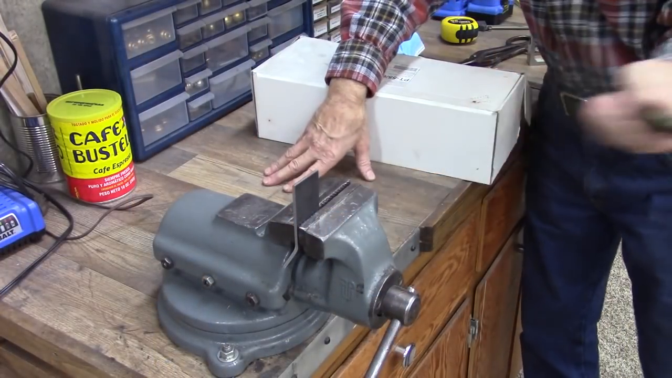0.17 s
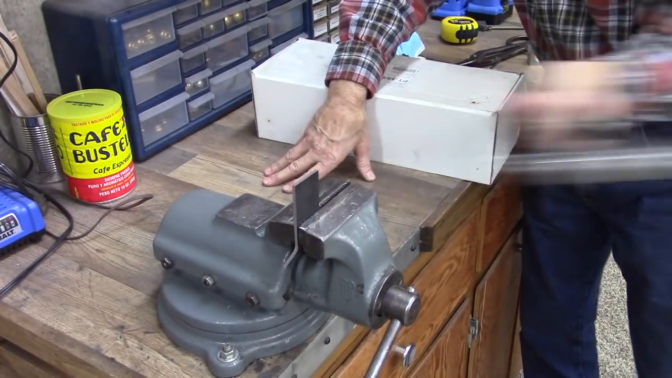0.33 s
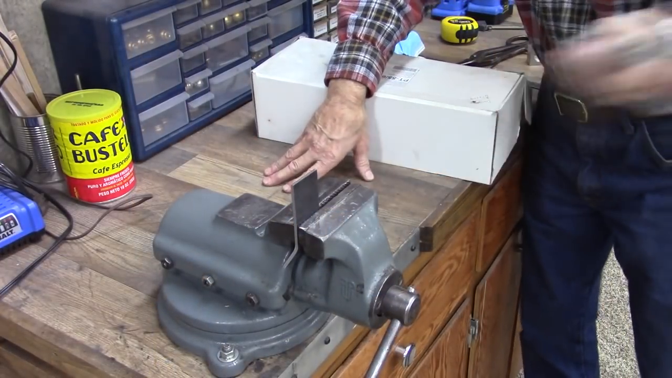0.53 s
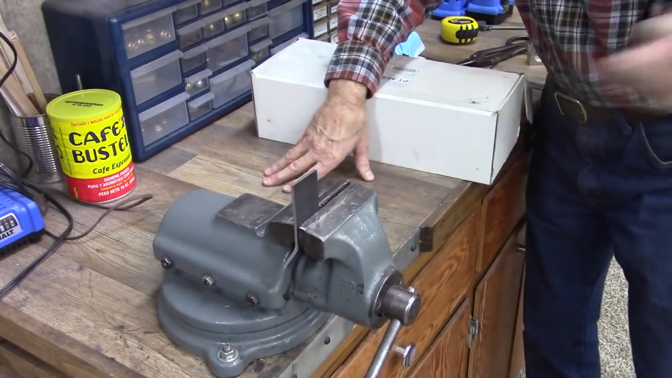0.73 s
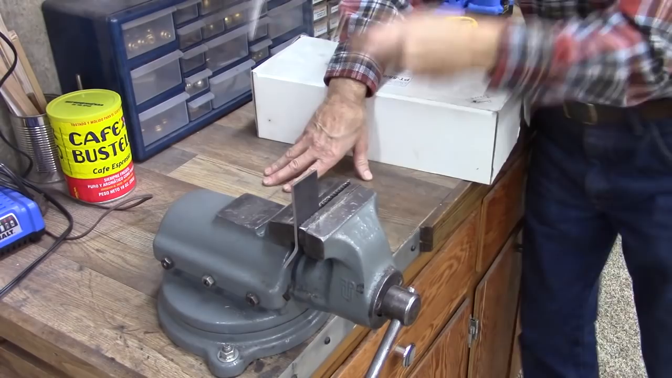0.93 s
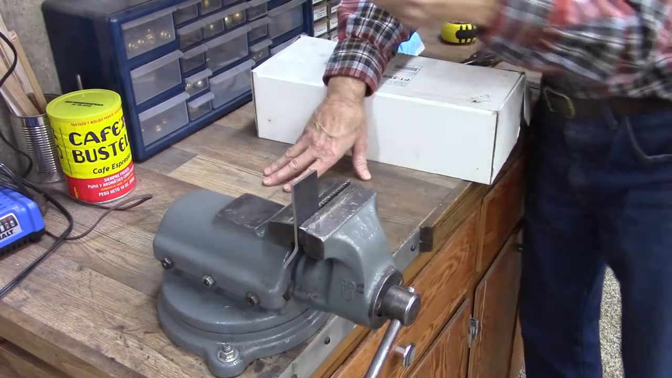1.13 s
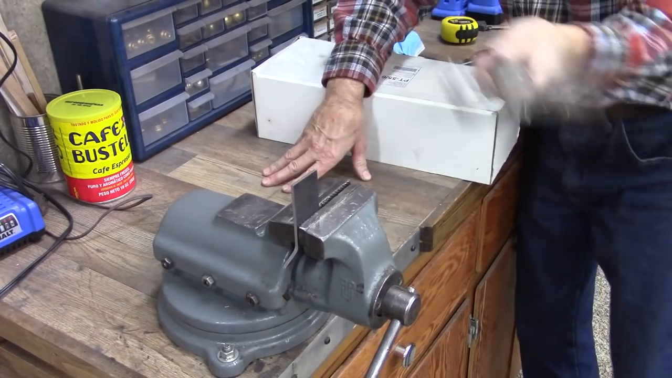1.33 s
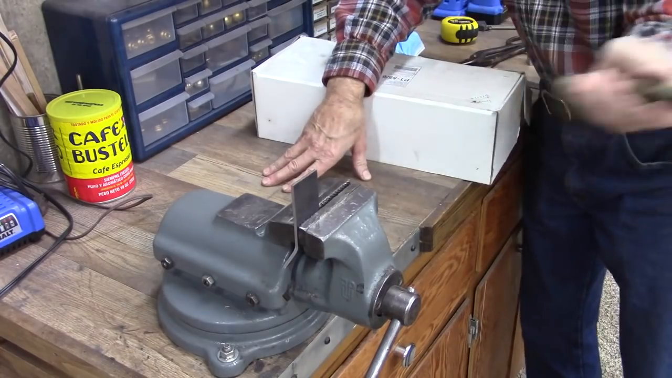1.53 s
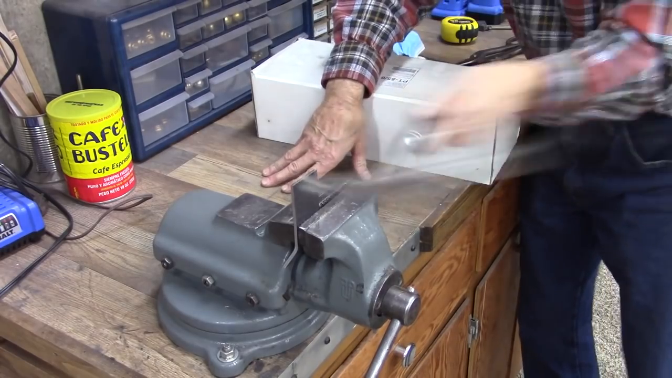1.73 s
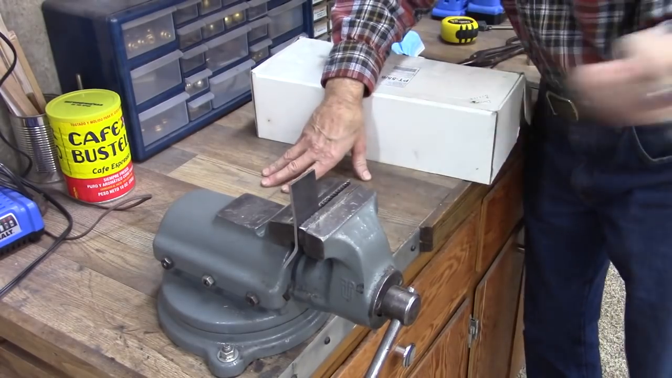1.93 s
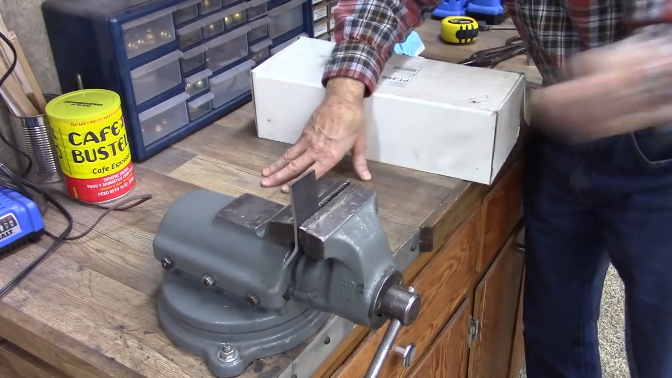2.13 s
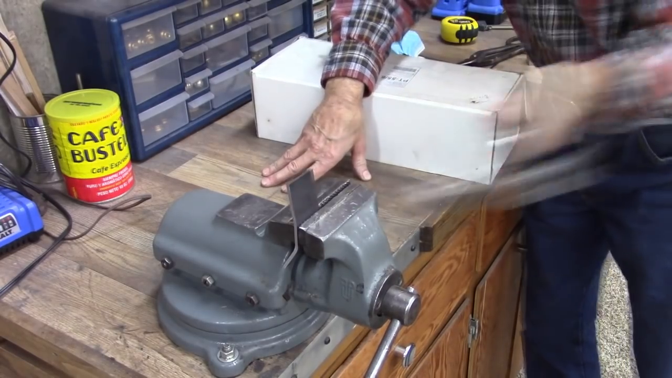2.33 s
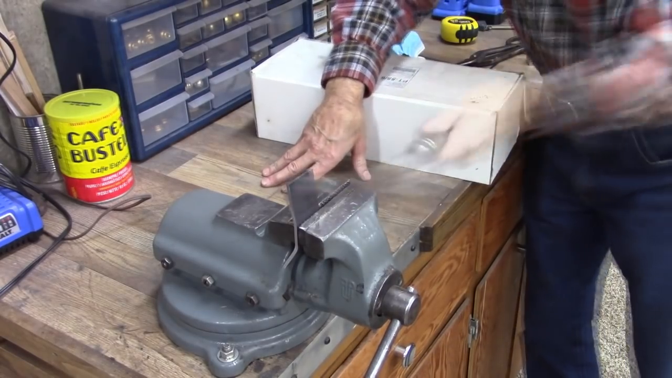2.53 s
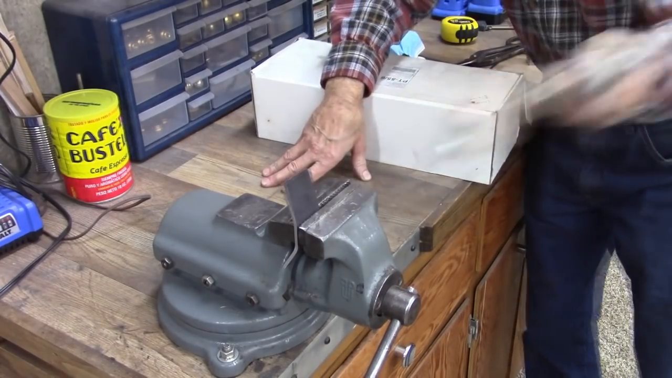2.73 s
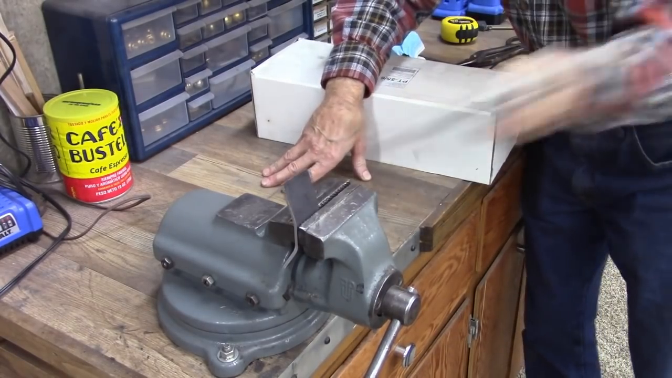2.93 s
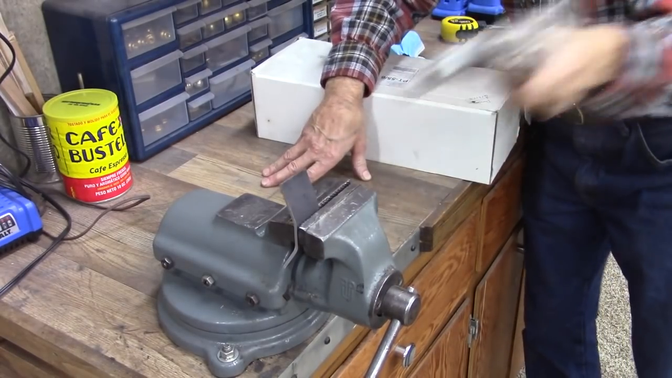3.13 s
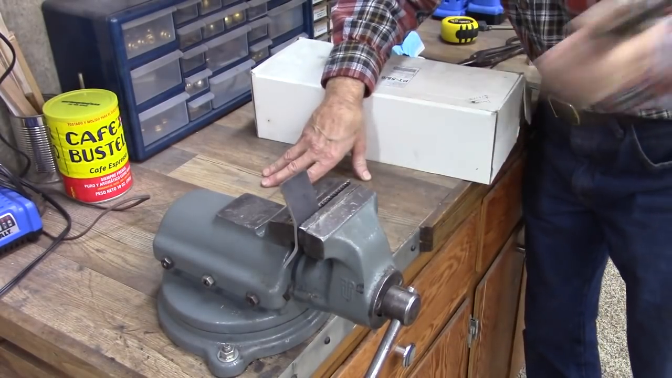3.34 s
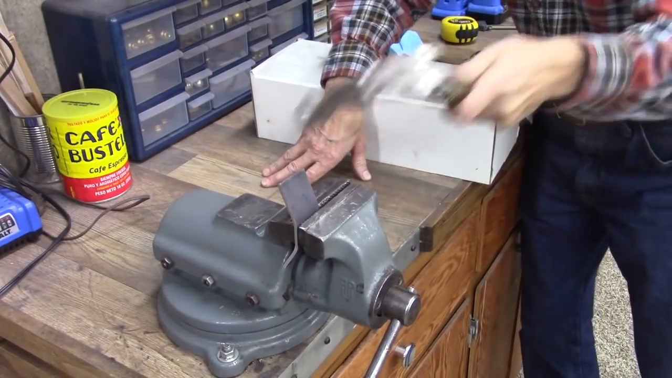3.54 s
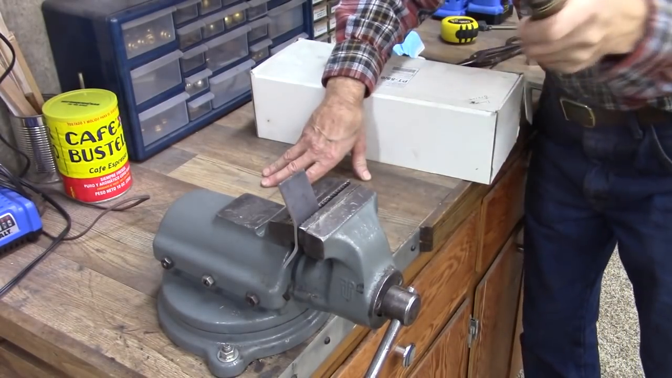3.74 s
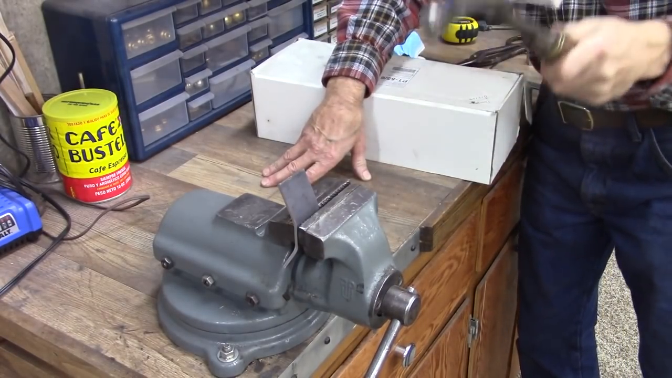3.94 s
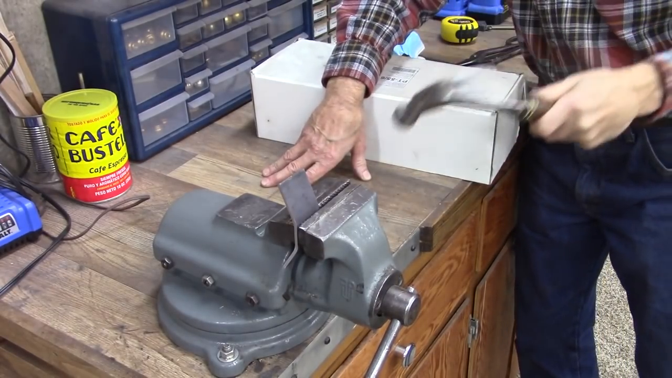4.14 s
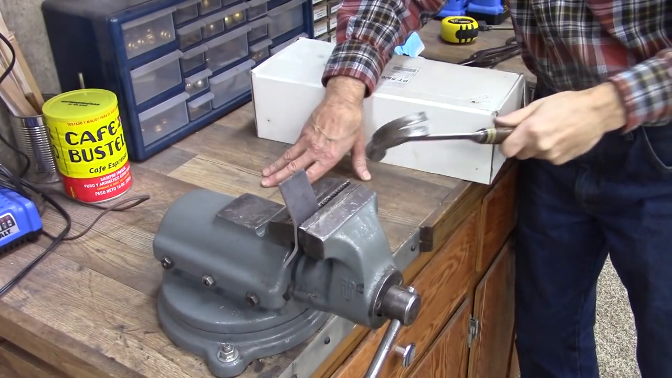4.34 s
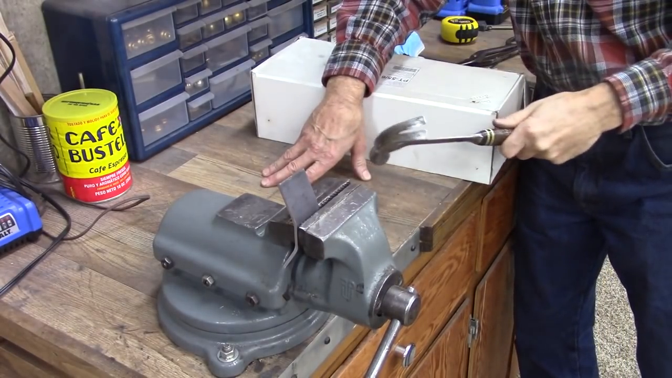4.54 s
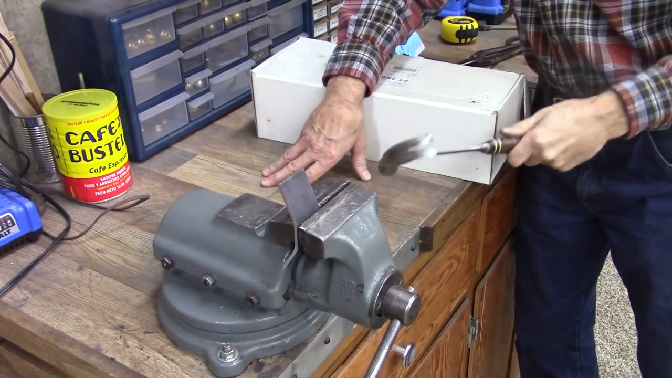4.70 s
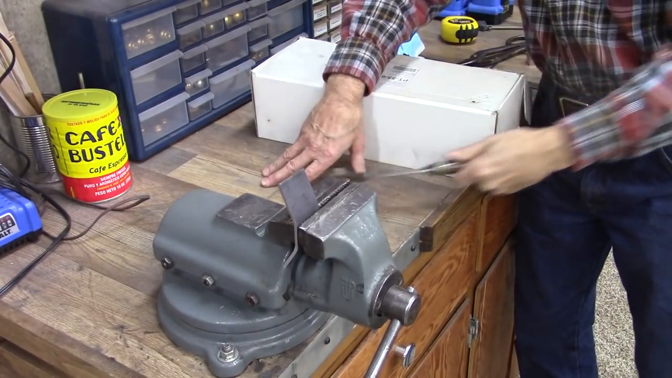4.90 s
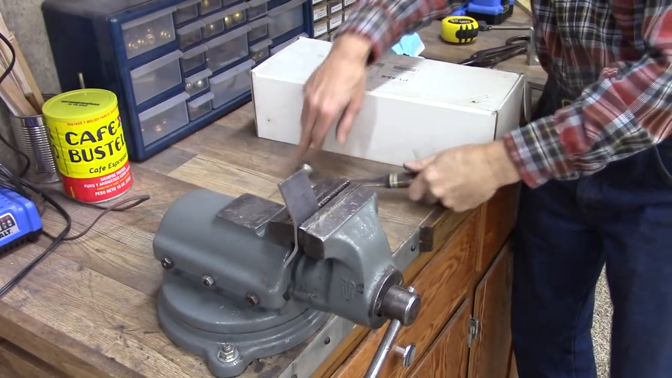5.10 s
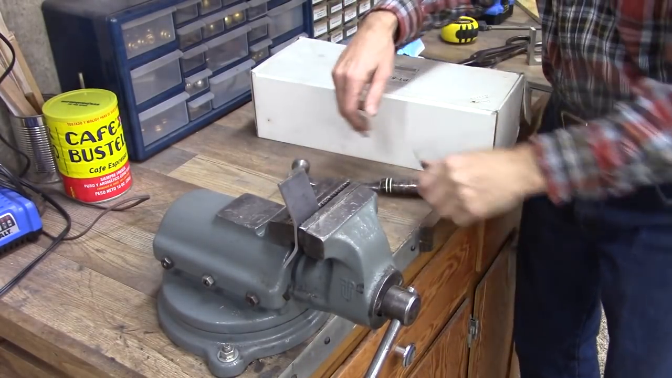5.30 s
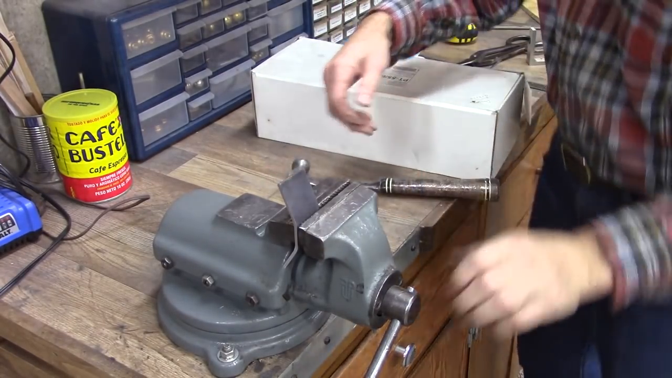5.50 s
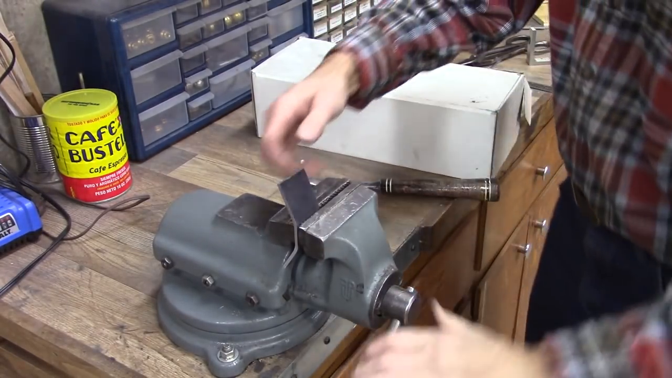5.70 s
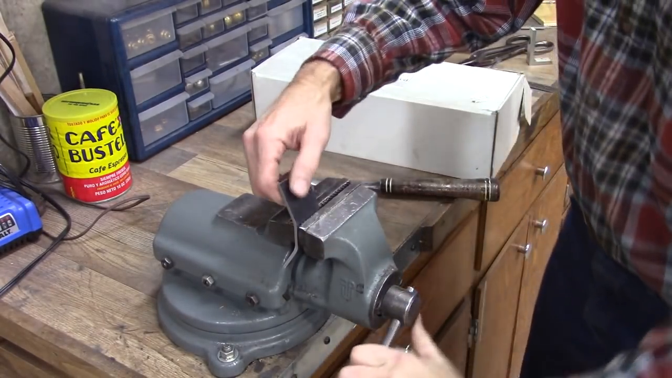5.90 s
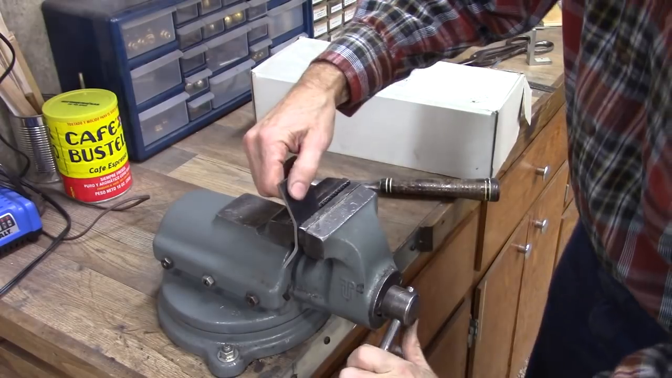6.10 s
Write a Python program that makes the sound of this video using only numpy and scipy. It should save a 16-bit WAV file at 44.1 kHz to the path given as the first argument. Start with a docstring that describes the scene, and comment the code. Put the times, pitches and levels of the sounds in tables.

```python
"""Hammering a steel strip over in a vise

A hammer bends a thin steel strip clamped in a bench vise, in a small hard-walled workshop. Each blow is a
burst of steel chatter through damped resonances, plus strip modes and a later vise and bench thud.
The hammer is then laid down: wood-coloured bursts and modes. Noise reflections and room tone surround it.
A close, nearly mono microphone overloads; its gain control ducks the blows and recovers into the room's tail."""
import sys
import numpy as np
from scipy import signal
from scipy.fft import rfft, irfft
from scipy.io import wavfile

SR = 44100
rng = np.random.default_rng(int(sys.argv[2]) if len(sys.argv) > 2 else 0)


def store_pcm(level_fs):
    """Save levels as 16-bit WAV."""
    pcm = np.round(np.clip(level_fs, -1, 1) * 32767).astype(np.int16)
    wavfile.write(sys.argv[1], SR, np.atleast_2d(pcm).T)


N = 271668
LEAD_S, EVENT_S = 0.25, 1.2  # track pre-roll; longest event
AGE = np.arange(int(EVENT_S * SR)) / SR  # time since an event began [s]

# Hammer on strip; spot 0 near the jaws, 1 at the free tip; glance 0 is a square hit.
# Ring level is set blow by blow: some ring freely, others sound muted.
# (time [s], force [dB], contact t60 [s], strip pitch [Hz], ring [dB], landing spot [0-1], glance [0-1])
HAMMER_BLOWS = [ (-.085, 24, 0.023, 1086, -2.5, .12, .06), (0.4734, 26, 0.013, 1085, -10.5, .25, 0),
                (0.9239, 23.5, 0.045, 1100, -4, 0.63, 1), (1.8344, 28.5, 0.011, 1122, -21.5, 0.27, 0.08),
                (2.1819, -3, 0.015, 1155, -19, 0.98, 0), (2.294, 23.5, 0.013, 1165, -8.5, 0.88, .08),
                (2.6309, 18.5, 0.003, 1155, -20, 0.9, 0), (2.733, 13.5, .025, 1146, -16.5, 0.93, 0.1),
                (3.0726, 28, 0.03, 1169, -17.5, 0, 0.01), (3.5188, 28, 0.031, 1210, -19.5, 0.05, 0.01)]
# Broad colour of the steel smack: (frequency [Hz], level [dB])
SMACK_SPECTRUM = [(150, -27.5), (700, 3.5), (1300, -12), (1800, 3), (1950, -1), (2500, 7), (3700, 0.5),
                  (5500, 0), (8000, 2.5), (12000, -2), (16000, -5.5)]
# Broad colour of the iron vise: (frequency [Hz], level [dB])
VISE_SPECTRUM = [(80, -12), (220, 2.5), (400, 10), (480, 9), (600, 10), (690, 7.5), (760, 9), (850, 5),
                 (1000, 8.5), (1400, 3), (3000, -23)]
TREBLE_EDGE_HZ = (11800, 6600)  # of the smack: (near the jaws, at the tip)


def from_db(db):
    """Decibels to gain."""
    return 10 ** (np.asarray(db) / 20)


def unit(x):
    """Scale to an energy of one."""
    return x / np.sqrt(np.sum(x ** 2))


def between(pair, share):
    """The value a share of the way from the first of a pair to the second."""
    return pair[0] + (pair[1] - pair[0]) * np.clip(share, 0, 1)


def at_hz(points, hz):
    """Read a table along a log-frequency axis."""
    f, value = np.transpose(points)
    return np.interp(np.log(np.maximum(hz, 1)), np.log(f), value)


def dying(t60):
    """An envelope that falls 60 dB in t60 seconds."""
    return np.exp(-np.log(1000) * AGE / max(t60, 1e-3))


def colour(x, spectrum):
    """Causal minimum-phase filter with the given spectrum, built by folding its cepstrum."""
    size = 8192
    bin_hz = np.arange(size // 2 + 1) * SR / size
    cepstrum = irfft(np.log(from_db(at_hz(spectrum, bin_hz))))
    cepstrum[1:size // 2] *= 2
    cepstrum[size // 2 + 1:] = 0
    impulse = irfft(np.exp(rfft(cepstrum)))[:size // 2]
    return signal.fftconvolve(x, impulse)[:len(x)]


def high_pass(x, hz):
    """Third-order low cut."""
    return signal.sosfilt(signal.butter(3, hz, "high", fs=SR, output="sos"), x)


def band(x, hz, octaves):
    """A cluster of close, well-damped resonances around hz."""
    edges_hz = hz * 2 ** (np.array([-0.5, 0.5]) * octaves)
    edges_hz = np.minimum(edges_hz, [0.44 * SR, 0.45 * SR])
    # tiny offset avoids denormals
    return signal.sosfilt(signal.butter(2, edges_hz, "band", fs=SR, output="sos"), x + 1e-18)


def with_humps(spectrum, humps, edge_hz=20000, steepness_db_per_octave=36, edge_floor_db=-15):
    """A spectrum plus broad resonances (Hz, dB, octaves); a treble edge shelves off the spectrum above it."""
    hz = np.geomspace(20, SR / 2, 300)
    shelf_db = np.clip(-steepness_db_per_octave * np.log2(hz / edge_hz), edge_floor_db, 0)
    power = from_db(at_hz(spectrum, hz) + shelf_db) ** 2
    for centre_hz, db, octaves in humps:
        detune = 2 * np.log2(hz / centre_hz) / octaves
        power = power + from_db(db) ** 2 / (1 + detune ** 4)
    return np.column_stack([hz, 10 * np.log10(power)])


def mode(hz, db, t60):
    """A struck mode: a dying sine with the given energy."""
    return from_db(db) * unit(np.sin(2 * np.pi * hz * AGE) * dying(t60))


def contact(t60, rebound_share=0.0, rebound_s=0.0033):
    """Chatter between hard faces, near-even in spectrum, of energy one; a springy part touches twice."""
    rebound = rebound_share * np.interp(AGE - rebound_s, AGE, dying(t60), left=0)
    envelope = np.hypot(dying(t60), rebound)
    burst = rng.standard_normal(len(AGE))
    # alternate shaping in time with flattening in frequency
    for _ in range(8):
        spectrum = rfft(burst * envelope)
        burst = irfft(spectrum / (np.abs(spectrum) + 1e-12), len(AGE))
        envelope = envelope ** 0.7
    return unit(burst * dying(10 * t60))


def silent_track():
    """An empty track that begins LEAD_S early."""
    return np.zeros(N + int(LEAD_S * SR))


def add(track, s, sound):
    """Mix a sound into a track that begins LEAD_S early."""
    start = max(round((s + LEAD_S) * SR), 0)
    track[start:start + len(sound)] += sound[:len(track) - start]


def hammer_blows(bench_lag_s=0.0045, thud_t60_s=0.07, rebound_share=0.9, ping_octaves=0.18,
                 afterring_db=-27, afterring_t60_s=0.3):
    """Face and strip chatter, strip modes ring, vise and bench answer late; returns hits and rings."""
    # Strip's upper modes: (frequency [Hz], level [dB], t60 [s])
    overtone_modes = [(1482, 7, 0.11), (4070, 2.5, .25), (4810, 3.5, 0.15), (5225, 2, .2), (5670, 0.5, .2),
                      (8495, -8, .2), (9850, -6, .15)]
    # Vise and bench modes: (frequency [Hz], level [dB], t60 [s])
    bench_modes = [(82, -11.5, 0.52), (111.4, -8, 0.62), (195.86, -16, 0.89), (213.4, -24, 1.0),
                   (204.4, 5, 0.15), (293, -20.5, 0.6), (343, -9.5, 0.53), (426, -20, 0.55),
                   (591.5, -20, 0.2), (626, -17, 0.6), (760, -22.5, 0.53)]
    # Broad colour of the bench's thud: (frequency [Hz], level [dB])
    thud_spectrum = [(25, -19), (50, -11.5), (80, 7), (140, 14.5), (200, 15), (250, 18.5), (340, 20),
                     (480, -0.5), (800, -0.5), (2000, -21)]
    # bending stiffens the strip: (straight, fully bent)
    strip_hz, ring_t60_s = (1087, 1213), (0.56, 0.2)
    # a glancing blow drives the bench less and the overtones more: (square, glancing)
    thud_db, vise_db = (-2, -14.5), (-0.5, 2)
    overtones_db, ping_db = (-30, -22.5), (2.5, 15)

    hits, rings = silent_track(), silent_track()
    overtones = sum(mode(*row) for row in overtone_modes)
    bench = sum(mode(*row) * (-1) ** k for k, row in enumerate(bench_modes))
    for s, force_db, contact_s, ring_hz, ring_db, spot, glance in HAMMER_BLOWS:
        force = from_db(force_db)
        bend = (ring_hz - strip_hz[0]) / (strip_hz[1] - strip_hz[0])

        # the strip springs back against the face; both touches excite its damped resonances
        resonances = strip_resonances(bend, spot, glance)
        ping = (ring_hz, between(ping_db, glance), ping_octaves)  # first swing of the main mode
        smack = with_humps(SMACK_SPECTRUM, resonances + [ping], between(TREBLE_EDGE_HZ, spot))
        steel = colour(contact(contact_s, rebound_share), smack)
        upper = from_db(between(overtones_db, glance)) * overtones
        add(hits, s, force * (steel + upper))

        # main mode, clank and clang lose most of their swing at once, then ring on quietly
        ring = mode(ring_hz, ring_db, between(ring_t60_s, bend))
        for hz, db, _ in resonances[:2]:
            ring += mode(hz, db + afterring_db, afterring_t60_s)
        add(rings, s, force * ring)

        # heavy vise and bench answer a moment later
        thud_gain = from_db(between(thud_db, glance))
        vise_gain = from_db(between(vise_db, glance))
        thud = thud_gain * colour(contact(contact_s + thud_t60_s), thud_spectrum)
        iron = vise_gain * colour(contact(contact_s + thud_t60_s), VISE_SPECTRUM)
        add(hits, s + bench_lag_s, force * (thud + iron))
        add(rings, s + bench_lag_s, force * thud_gain * bench)
    return hits, rings


def strip_resonances(bend, spot, glance, octaves=0.26):
    """Damped clank, clang, sizzle and skid of the struck strip: (Hz, dB, octaves)."""
    # landing spot: (near the jaws, at the tip)
    clank_hz, clang_hz = (3262, 2830), (4380, 5950)
    clang_db, sizzle_db = (8.5, 1), (-7, 4)
    sizzle_hz = (8200, 11500)  # (straight, fully bent)
    clank_db, skid_db = (14, -3), (-10.5, 3)  # (square, glancing)
    return [(between(clank_hz, spot), between(clank_db, glance), octaves),
            (between(clang_hz, spot), between(clang_db, spot), octaves),
            (between(sizzle_hz, bend), between(sizzle_db, spot), octaves),
            (7700, between(skid_db, glance), 0.4)]  # face skidding over the edge


def cracks(crack_db=-10.5, crack_hz=9400, crack_octaves=0.68, crack_t60_s=0.002):
    """First touch of each blow: a very brief, bright crack, beamed too narrowly to fill the room."""
    track = silent_track()
    for s, force_db, *_ in HAMMER_BLOWS:
        crack = unit(band(contact(crack_t60_s), crack_hz, crack_octaves))
        add(track, s, from_db(force_db + crack_db) * crack)
    return track


def noise_swell(start_s=2.19, length_s=0.073, noise_db=2.6, swell_db=7, bend=0.39, spot=1.0,
                glance=0.056, vise_db=2):
    """A short noise swell before the next blow, coloured like strip and vise."""
    swell = from_db(swell_db * np.minimum(AGE / length_s, 1)) * (AGE < length_s)
    noise = from_db(noise_db) * unit(rng.standard_normal(len(AGE)) * swell)
    resonances = strip_resonances(bend, spot, glance)
    smack = with_humps(SMACK_SPECTRUM, resonances, between(TREBLE_EDGE_HZ, spot))
    steel = colour(noise, smack)
    iron = from_db(vise_db) * colour(noise, VISE_SPECTRUM)
    track = silent_track()
    add(track, start_s, steel + iron)
    return track


def hammer_laid_down(wood_t60_s=0.0632, click_hz=5440, click_octaves=0.47, mode_spread_db=-3.0,
                     bass_cut_hz=180):
    """Handle and head knock on the bench top: damped wood, short modes and a click."""
    # Knocks; hardness 0 is the handle, 1 the steel head:
    # (time [s], force [dB], knock [Hz], hardness [0-1])
    knocks = [ (5.0944, 12.5, 747, 0), (5.1100, 11.5, 740, 0.23), (5.2085, 16.5, 1000, 1),
              (5.3501, 9, 1000, 0.68), (5.3738, 5, 950, 0.8), (5.4095, -4.5, 800, 0.1)]
    # Broad colour of the wood: (frequency [Hz], level [dB])
    wood_spectrum = [(40, -21), (110, 5.5), (170, 13.5), (235, 18), (350, 21.5), (470, 17), (590, 17.5),
                     (900, 11.5), (1200, 5.5), (1800, 6), (2700, 1), (4000, -8), (9000, -13.5),
                     (13000, -41)]
    # Handle and bench top modes: (frequency [Hz], level [dB], t60 [s])
    wood_modes = [(216, -8.5, .2), (345, -7, 0.32), (585, -11.5, .14), (679, -7.5, 0.25),
                  (748.5, -7, 0.094), (940, -11.5, 0.16)]
    # a harder knock is broader and clicks more: (handle, head)
    knock_db, knock_octaves = (23.5, 13.5), (0.23, 1.03)
    click_db, click_t60_s = (-20.5, 1), (0.0061, 0.043)

    track = silent_track()
    for s, force_db, knock_hz, hardness in knocks:
        hump = (knock_hz, between(knock_db, hardness), between(knock_octaves, hardness))
        wood = colour(contact(wood_t60_s), with_humps(wood_spectrum, [hump]))
        # each knock lands elsewhere and favours other modes
        ringing = sum(mode(hz, db + mode_spread_db * rng.standard_normal(), t60)
                      for hz, db, t60 in wood_modes)
        # low cut removes the bass made by the modes' abrupt sine onsets
        ringing = high_pass(ringing + 1e-18, bass_cut_hz)
        click = band(contact(between(click_t60_s, hardness)), click_hz, click_octaves)
        click = from_db(between(click_db, hardness)) * click
        add(track, s, from_db(force_db) * (wood + ringing + click))
    return track


def scuffs_and_ticks(octaves=1.0, ticks_per_s=1.3, tick_db=-37, tick_hz=2900, tick_t60_s=0.006,
                     tick_spread_db=3, tick_spread_octaves=0.5):
    """Hands and tool shift: band-limited contact noise at set times, fainter ticks at random times."""
    # Scuffs and bumps: (time [s], level [dB], frequency [Hz], t60 [s])
    scuffs = [(1.287, -25.5, 6000, 0.17), (1.371, -26, 6000, .35), (1.7826, -29, 4450, 0.034),
              (4.39, -24.5, 230, .4), (5.0455, -23, 4500, .008), (5.705, -24, 188, 0.101),
              (5.901, -39, 6000, 1.1)]
    track = silent_track()
    for s, db, hz, t60 in scuffs:
        add(track, s, from_db(db) * unit(band(contact(t60), hz, octaves)))
    touch = contact(tick_t60_s)
    duration_s = N / SR
    for when, size, pitch in rng.uniform(-1, 1, (round(ticks_per_s * duration_s), 3)):
        hz = tick_hz * 2 ** (tick_spread_octaves * pitch)
        tick = unit(band(touch, hz, octaves))
        add(track, abs(when) * duration_s, from_db(tick_db + tick_spread_db * size) * tick)
    return track


def workshop(x, build_s=0.0013, band_octaves=0.56):
    """Dense reflections that build up quickly and die band by band; returns mid and side."""
    # Reverberation time: (frequency [Hz], t60 [s])
    room_t60 = [(80, 0.56), (200, 0.5), (500, 0.49), (1200, 0.43), (3200, 0.45), (6000, 0.43),
                (10000, 0.32), (15000, 0.26)]
    # What the walls send back: (frequency [Hz], level [dB])
    wall_spectrum = [(200, -2.5), (1000, -1), (5000, -4), (10000, -6.5), (12500, -5.5), (15500, -8)]
    # Stereo width of the room: (frequency [Hz], side minus mid [dB])
    room_width = [(100, -55), (350, -48), (700, -25.5), (1400, -24), (2800, -17.5), (5600, -11),
                  (11000, -12)]
    centres_hz = 40 * 2 ** (np.arange(18) / 2)
    build = 1 - np.exp(-AGE / build_s)
    tails = []
    for white in rng.standard_normal((2, 2, len(AGE))):
        # neighbouring bands take alternate noises
        tail = sum(band(white[k % 2], hz, band_octaves) * dying(at_hz(room_t60, hz))
                   for k, hz in enumerate(centres_hz))
        reflections = colour(unit(tail * build), wall_spectrum)
        tails.append(signal.fftconvolve(x, reflections)[:len(x)])
    return tails[0], colour(tails[1], room_width)


def room_tone(tone_db=-57):
    """Steady low rush and capsule hiss from coloured noise; returns mid and side."""
    # Room tone colour: (frequency [Hz], level [dB])
    tone_spectrum = [(25, -23), (60, -8), (110, -6), (200, -2), (260, -4), (360, -1), (600, -5.5),
                     (1100, -8.5), (2500, -14), (5500, -20), (11000, -24), (15500, -41.5)]
    # Width of room tone and capsule hiss: (frequency [Hz], side minus mid [dB])
    tone_width = [(60, -6.5), (180, -11.5), (550, -8), (1650, -7.5), (4970, -9.5), (15000, -14)]
    mid, side = [from_db(tone_db) * np.sqrt(N) * unit(colour(white, tone_spectrum))
                 for white in rng.standard_normal((2, N))]
    return mid, colour(side, tone_width)


def scene(direct_db=-3.5, room_db=2.0, ring_db=-0.5, ring_room_db=-13.0, handling_db=0.5,
          handling_room_db=-1.0):
    """Direct sound, room and room tone at a closely spaced pair of capsules."""
    hits, rings = hammer_blows()
    hits = hits + noise_swell()
    handling = hammer_laid_down() + scuffs_and_ticks()
    direct = from_db(direct_db) * hits + cracks()
    direct += from_db(ring_db) * rings + from_db(handling_db) * handling
    room_send = from_db(room_db) * hits + from_db(ring_room_db) * rings
    room_send += from_db(handling_room_db) * handling
    room_mid, room_side = workshop(room_send)
    tone_mid, tone_side = room_tone()
    # drop the pre-roll
    mid = (direct + room_mid)[-N:] + tone_mid
    side = room_side[-N:] + tone_side
    return np.array([mid + side, mid - side])


def record(dry, low_cut_hz=55, threshold_db=-11.0, release_db_per_s=170, attack_s=0.0015, sense_s=0.0069,
           ahead_s=0.00019, top_cut_hz=15800):
    """Low cut; gain control ducks loud sound and recovers at a set rate; peaks saturate; top cut."""
    dry = high_pass(dry, low_cut_hz)
    sense, attack = np.exp(-1 / (sense_s * SR)), np.exp(-1 / (attack_s * SR))
    power = signal.lfilter([1 - sense], [1, -sense], np.mean(dry ** 2, axis=0))
    excess_db = np.maximum(10 * np.log10(power + 1e-12) - threshold_db, 0)
    # running maximum against a ramp: instant rise, linear release in dB
    ramp_db = release_db_per_s * np.arange(N) / SR
    held_db = np.maximum.accumulate(excess_db + ramp_db) - ramp_db
    duck_db = signal.lfilter([1 - attack], [1, -attack], held_db)
    # look ahead slightly
    duck_db = np.interp(np.arange(N) + ahead_s * SR, np.arange(N), duck_db)
    clipped = np.tanh(dry * from_db(-duck_db))
    return signal.sosfilt(signal.ellip(10, 0.1, 70, top_cut_hz, fs=SR, output="sos"), clipped)


dry = scene()
out = record(dry)
store_pcm(out)
```